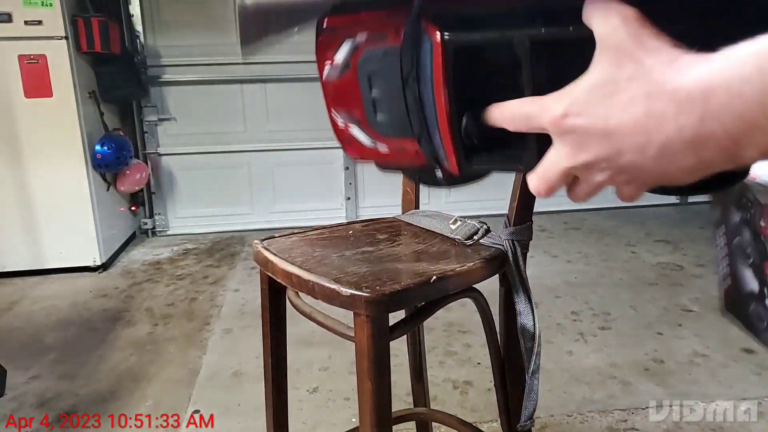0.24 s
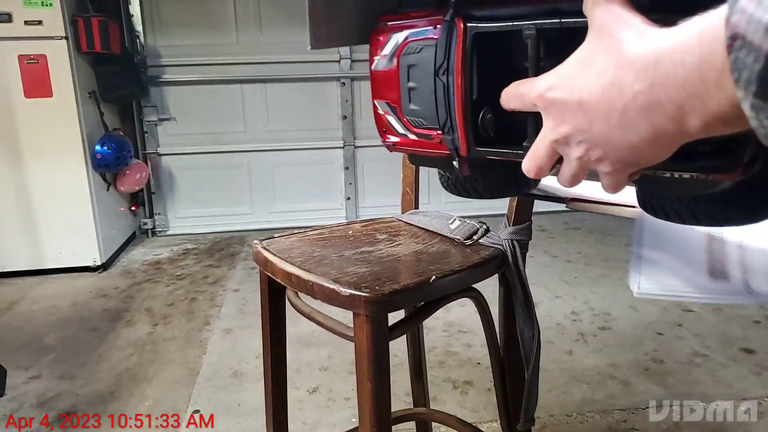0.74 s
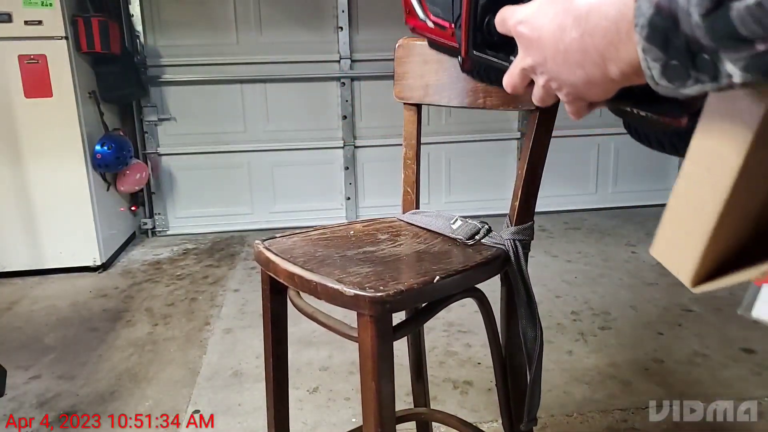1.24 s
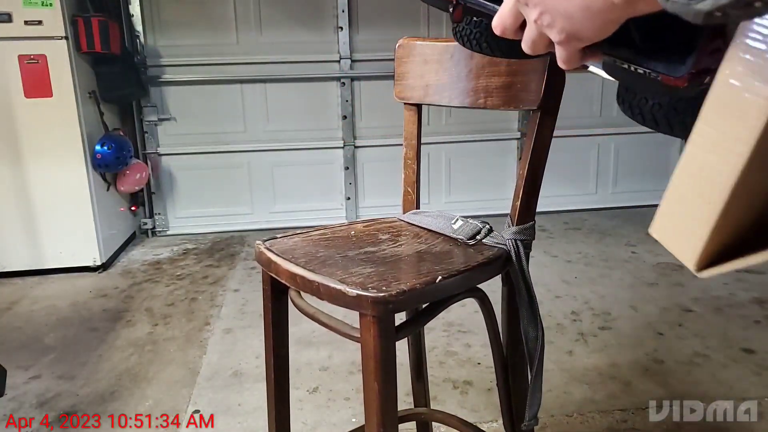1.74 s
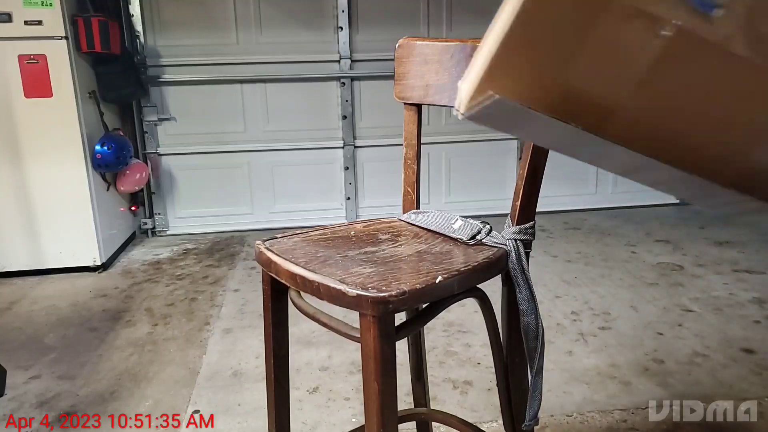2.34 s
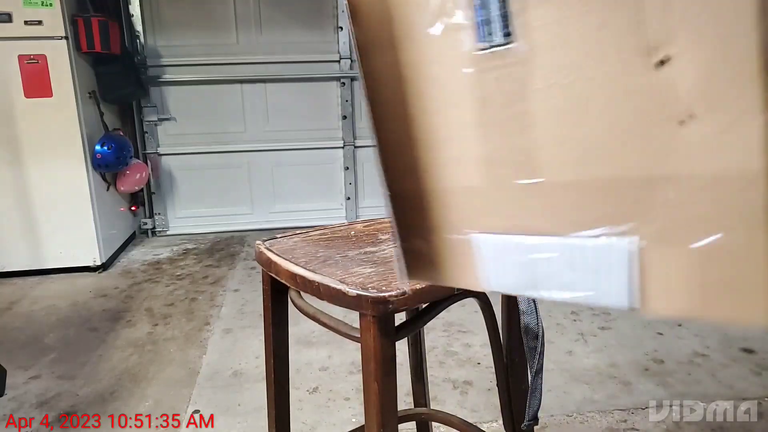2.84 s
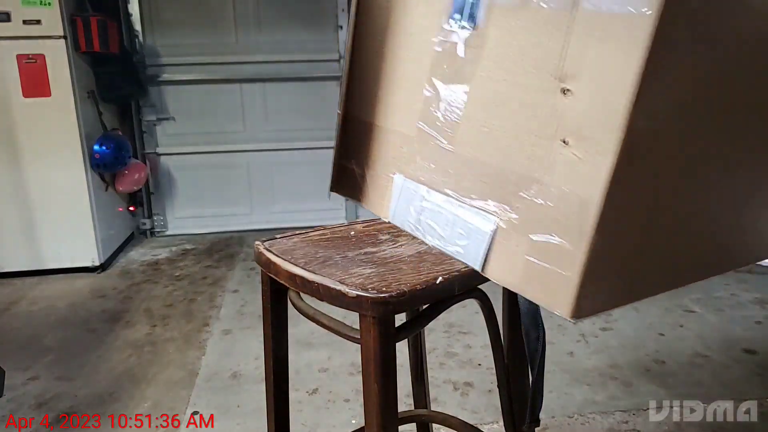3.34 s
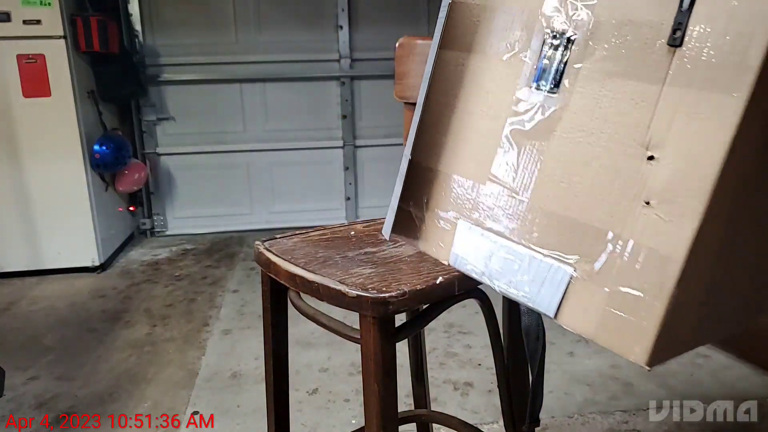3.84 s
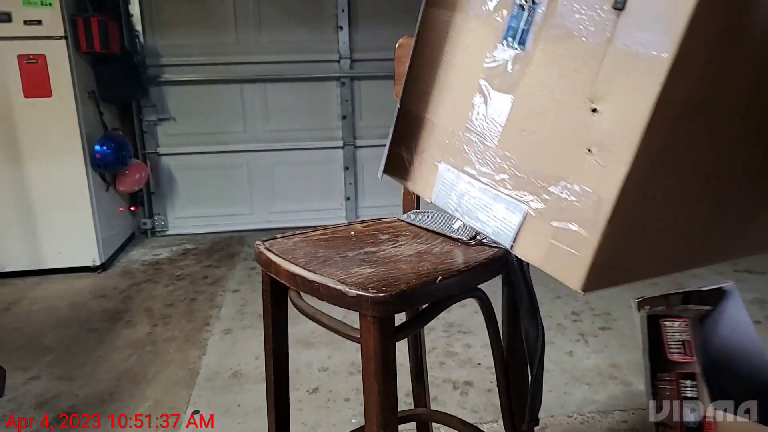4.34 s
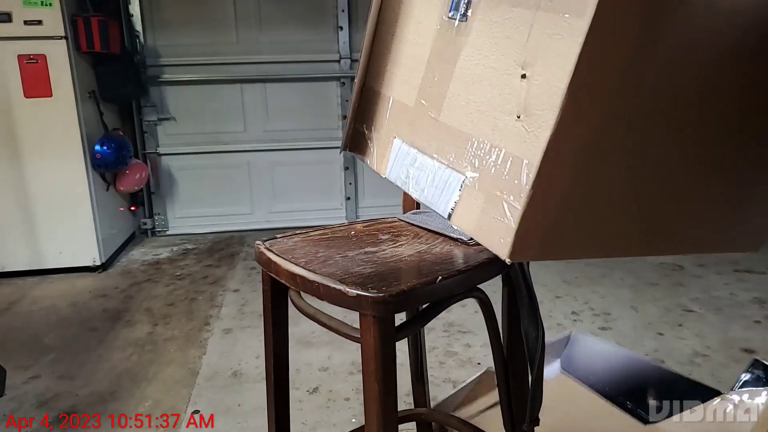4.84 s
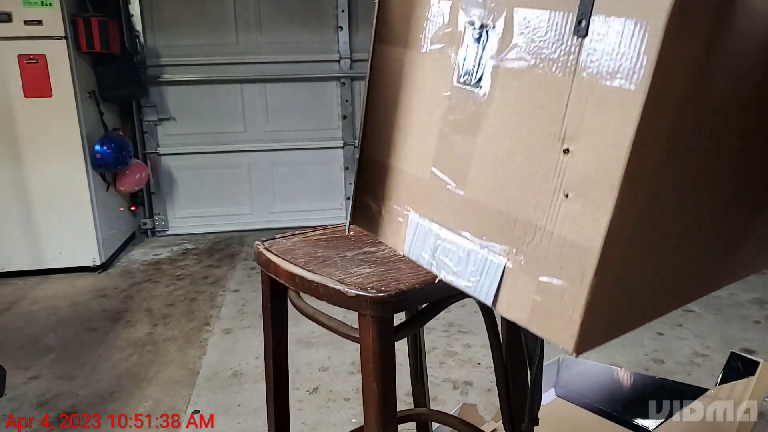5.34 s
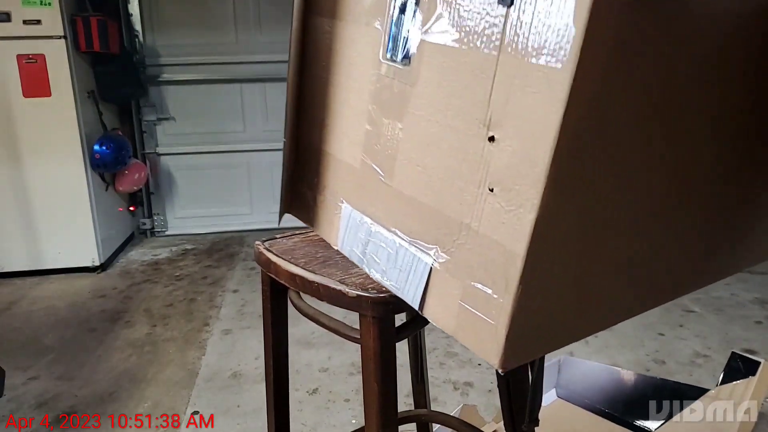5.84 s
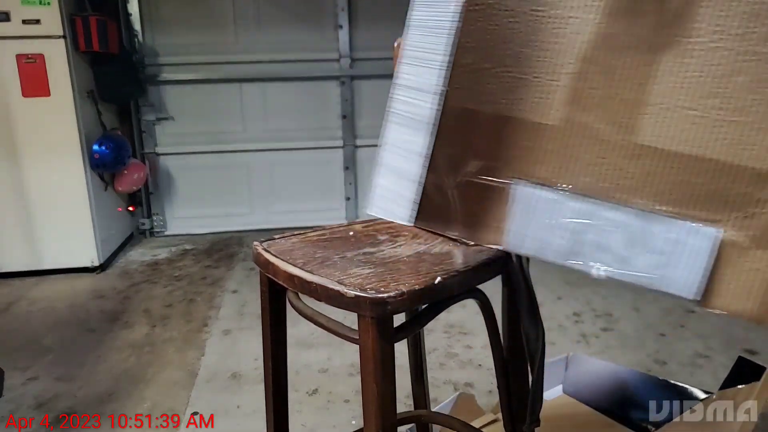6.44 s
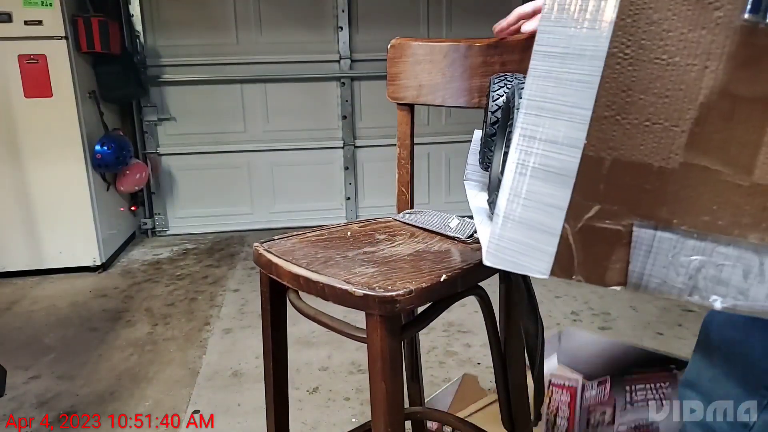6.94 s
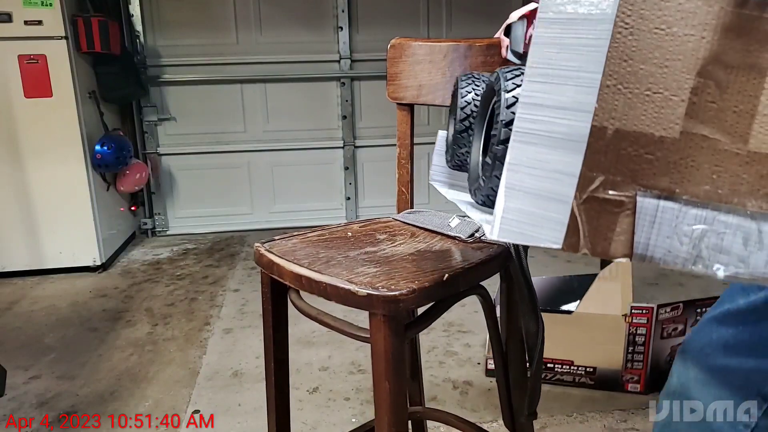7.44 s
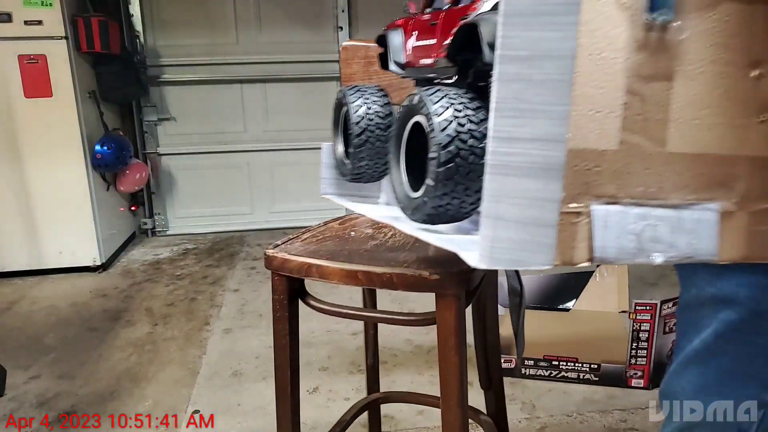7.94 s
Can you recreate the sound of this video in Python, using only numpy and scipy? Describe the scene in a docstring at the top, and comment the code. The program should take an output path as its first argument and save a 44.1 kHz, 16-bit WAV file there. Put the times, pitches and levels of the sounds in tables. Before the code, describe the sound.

Cardboard boxes knock, scrape and crackle close by in a bare garage, with sparse rustles between, ending in a juddering, squeaking pull from a carton.

```python
"""Cardboard packaging comes apart in a bare garage, close to two microphone ports.
From the start panels knock as ringing modes with a noisy crush, over rubbed-noise strokes and scuffs;
tape and creases tick in short noise snaps. Near three seconds filtered noise rattles like small metal.
At the end a toy truck's tray judders out of the carton: uneven slip pulses ring it, squeal and crackle.
Throughout, a low rumble swells with the flexing panels over still air; a dense tail answers the contacts."""
import sys
import numpy as np
from scipy import signal
from scipy.fft import rfft, irfft, next_fast_len
from scipy.io import wavfile

SR = 44100
rng = np.random.default_rng(int(sys.argv[2]) if len(sys.argv) > 2 else 0)


def waveform_to_disk(signal):
    """Save audio, clipped to [-1, 1], as 16-bit WAV at the path in sys.argv[1]."""
    frames = np.transpose(np.atleast_2d(signal))
    scaled = np.clip(frames, -1, 1) * 32767
    samples = np.round(scaled).astype(np.int16)
    wavfile.write(sys.argv[1], SR, samples)


N = 361170

# Levels marked "before trim" get a further gain in the function that plays them.
# Knocks: (time [s], clap [dB before trim], thump [dB before trim], panel pitch [Hz],
#          crack [dB before trim], time for the crush to fall 20 dB [s])
KNOCK_EVENTS = [(.004, -27, -24.5, 189, -34, 0.025), (.063, -21.5, -29.5, 396, -34, 0.016),
                (.205, -12, -16.5, 409, -14, .011), (.295, -18.5, -19, 140, -47, 0.015),
                (.338, -19, -27, 166, -47, 0.03), (.472, -25.5, -20.5, 246, -30, 0.016),
                (.551, -23.5, -34.5, 189, -22, 0.015), (.891, -37.5, -27.5, 216, -56, 0.062),
                (1.183, -11, -11, 260, -23.5, 0.013), (1.336, -26, -20, 237, -43, 0.023),
                (1.403, -24, -23.5, 234, -41, 0.057), (1.744, -36, -39, 251, -46, 0.03),
                (1.869, -43.5, -35.5, 248, -41.5, 0.078), (2.23, -62, -39, 235, -52, .014),
                (2.526, -35, -31.5, 243, -46, 0.0089), (2.554, -24, -32.5, 409, -38, 0.018),
                (2.59, -59, -31, 214, -52, .02), (2.805, -29.5, -30.5, 202, -52, .026),
                (2.821, -28, -25.5, 143, -45, 0.013), (2.913, -28, -29.5, 287, -31, 0.018),
                (2.991, -21.5, -22, 222, -11, 0.014), (3.085, -28.5, -30.5, 228, -45, 0.0073),
                (3.311, -36.5, -34.5, 241, -45, 0.0067), (3.999, -27.5, -31.5, 140, -33, 0.018),
                (4.013, -28, -28.5, 200, -39, 0.014), (4.119, -20.5, -27, 351, -37, 0.0065),
                (4.167, -26.5, -24.5, 149, -25.5, 0.018), (4.251, -17, -8, 303, -14, .015),
                (4.267, -15, -14.5, 304, -43, 0.036), (4.280, -13.5, -11, 207, -26, 0.034),
                (4.326, -20, -20.5, 340, -31.5, 0.05), (4.983, -11, -13.5, 177, -28, 0.015),
                (5.049, -34, -28, 223, -20, .016), (5.310, -40, -39, 202, -82, 0.0078),
                (5.559, -46, -52, 204, -66, 0.013), (5.941, -35, -32.5, 151, -47, .017),
                (6.559, -37.5, -29.5, 157, -58, 0.029), (6.891, -19, -23, 211, -35, .023),
                (6.909, -17, -16.5, 213, -43, 0.013), (6.922, -9.5, -15.5, 263, -37, 0.015),
                (6.935, -28, -8, 303, -42, .012), (6.951, -15.5, -4, 231, -34, 0.022),
                (6.997, -14, -16, 276, -16, 0.0067), (7.019, -18.5, -22, 220, -21, 0.041),
                (7.213, -32, -27.5, 201, -30, 0.01), (7.349, -33, -22, 229, -22, 0.013),
                (7.657, -23, -22, 260, -52, 0.015), (7.731, -14, -14, 253, -45, 0.047),
                (8.063, -34.5, -41, 182, -45, 0.048)]
# Modes of a struck panel: (multiple of its pitch [ratio], relative level [dB], t60 [s])
PANEL_MODES = [(0.702, -15.5, 0.046), (1, 3.5, 0.038), (1.5, -2.5, 0.022), (2.1, -15.5, 0.093),
               (2.9, -17.5, 0.046)]
# Colour of a clap: (multiple of its centre [ratio], relative density [dB per Hz])
CLAP_COLOUR = [(.15, -49), (.35, 3.5), (.7, -1.5), (1, -5), (1.5, -2), (2.4, -9), (4.5, -16.5), (12, -55),
               (30, -62)]
# Strokes of cardboard over cardboard: (start [s], swell [s], hold [s], panel drumming [dB before trim],
#                                       edge scrape [dB before trim], face hiss [dB before trim])
STROKE_EVENTS = [(0, 0.001, 0.026, -29.5, -29, -33), (0.172, 0.04, 0.096, -29, -31, -31.5),
                 (0.401, 0.046, 0.15, -41, -43, -42), (0.613, 0.024, .33, -56, -56.5, -49.5),
                 (1.004, 0.033, 0.25, -51, -57.5, -65.5), (1.16, .06, .12, -36, -44, -50),
                 (1.32, .085, .02, -29, -36, -41), (1.45, .04, .03, -45, -44, -50),
                 (1.55, .06, .17, -49, -58, -61), (1.82, 0.016, 0.25, -69, -65, -59.5),
                 (2.054, 0.12, 0.28, -52.5, -53.5, -50.5), (2.347, 0.047, 0.29, -53.5, -50, -51.5),
                 (2.663, 0.076, 0.047, -49.5, -52, -58), (2.785, 0.035, 0.12, -35.5, -43.5, -41.5),
                 (2.868, 0.074, .015, -51, -37, -36), (2.969, 0.04, 0.035, -42, -35.5, -31.5),
                 (3.28, 0.12, 0.46, -54, -66.5, -72), (3.6, 0.13, 0.72, -51, -57, -57.5),
                 (3.99, .025, .22, -35, -39, -43), (4.241, .005, .12, -32, -34, -39),
                 (4.39, .04, .05, -40, -44, -48), (4.5, .04, .18, -43, -50, -60),
                 (4.726, 0.046, 0.23, -40, -42, -49), (4.987, 0.037, 0.063, -27, -32.5, -42.5),
                 (5.412, .012, 0.049, -55, -55, -60.5), (5.56, 0.027, 0.064, -54, -59.5, -63.5),
                 (5.819, 0.082, 0.14, -53.5, -56.5, -63.5), (5.949, 0.083, 0.013, -37, -35.5, -41),
                 (6.076, 0.026, 0.075, -46, -47, -49), (6.534, 0.021, 0.23, -48, -61.5, -83),
                 (6.787, 0.058, 0.082, -42, -43, -42.5), (6.873, 0.049, 0.14, -23, -23.5, -36),
                 (7.11, .04, 0.063, -54, -58, -46.5), (7.202, 0.031, 0.17, -38, -38.5, -41),
                 (7.298, .015, 0.29, -37.5, -37, -39), (7.653, 0.031, 0.1, -25, -26.5, -48),
                 (7.826, 0.021, 0.069, -27, -33.5, -49), (8.046, .03, 0.076, -35, -53, -62)]
# Colour of a rubbed panel drumming: (frequency [Hz], relative density [dB per Hz])
DRUM_COLOUR = [(30, -46.5), (80, -39), (130, -10.5), (180, 5), (260, -1), (440, -2.5), (600, -9.5),
               (1200, -39), (5000, -80.5)]
# Colour of a scraping edge: (frequency [Hz], relative density [dB per Hz])
SCRAPE_COLOUR = [(250, -35.5), (500, -0.5), (800, 3), (1400, 0), (2300, -4), (3600, -7.5), (5500, -19.5),
                 (9000, -44), (14000, -82.5)]
# Colour of flat faces sliding, also of a crack: (frequency [Hz], relative density [dB per Hz])
HISS_COLOUR = [(500, -59), (2000, -0.5), (4000, 1), (5500, -1), (7200, -5), (9200, -1), (12000, -2.5),
               (15500, -2)]
# Force on the tray as it sticks and slips out of the carton: (time [s], level [dB before trim])
JUDDER_FORCE = [(7.64, -40), (7.66, -19.5), (7.735, -14.5), (7.785, -18.5), (7.83, -26.5), (7.89, -23),
                (8.0, -33), (8.07, -35), (8.19, -44)]
# Ringing of the carton with the tray in it: (frequency [Hz], width [Hz], relative level [dB])
TRAY_MODES = [(176, 9.5, -3.5), (254.9, 9.8, 9), (361, 19, 2), (505, 35, -8.5), (723, 54, -8),
              (1116, 14, -18), (1360, 9.8, -19)]
# Squeal of the tray while pressed hard: (frequency [Hz], width [Hz], relative level [dB])
SQUEAL_MODES = [(1778, 45, 0), (2388, 35, -2), (3090, 80, -3), (3800, 90, -12)]
# Colour of creases crackling under the tray: (frequency [Hz], relative density [dB per Hz])
CRACKLE_COLOUR = [(1000, -25), (3500, -5), (8000, 4), (14000, -15)]
# Scuffs, an edge chattering at one pitch: (time [s], level [dB], pitch [Hz], width [Hz], length [s])
SCUFF_EVENTS = [(0.063, -34.5, 1010, 296, .014), (0.2, -18, 1500, 910, 0.02),
                (1.183, -36, 2530, 2190, .013), (2.164, -53, 1300, 800, 0.041),
                (2.299, -49, 1500, 900, 0.022), (2.381, -47, 1010, 500, 0.05),
                (2.985, -33, 3900, 350, 0.02), (4.26, -18.5, 458, 190, 0.055), (4.57, -50, 1170, 600, .17),
                (5.308, -50, 694, 597, 0.026), (6.807, -51, 3000, 2000, .07),
                (6.918, -17, 2450, 900, 0.0071), (6.996, -16, 1420, 350, 0.0061),
                (7.317, -33.5, 725, 200, 0.028), (7.38, -39, 536, 140.7, 0.15),
                (7.51, -36.5, 3170, 1600, 0.062), (7.55, -34, 290, 109, .073), (7.86, -28, 200, 70.5, 0.1)]
# Ticks of tape or of a crease: (time [s], level [dB before trim], centre [Hz])
TICK_EVENTS = [(.161, -28.5, 13000), (.390, -26, 8000), (.570, -24, 9100), (.643, -30, 5930),
               (.691, -29, 9100), (2.552, -20.5, 13200), (2.630, -32, 12000), (2.756, -39, 10100),
               (3.521, -37, 10100), (3.561, -38, 3300), (3.795, -29, 12800), (4.251, -18, 10000),
               (4.766, -38, 10000), (4.814, -32.5, 9200), (4.982, -17.5, 2576), (6.022, -25.5, 8950),
               (6.134, -31.5, 10400), (6.897, -17.5, 6500), (6.946, -10.5, 6340), (7.724, -18, 5560),
               (7.758, -23.5, 4950)]
# Resonances of a small metal part: (frequency [Hz], width [Hz], relative level [dB])
BUCKLE_MODES = [(3920, 91, -1), (9400, 300, -4), (10900, 560, -4), (12600, 230, -6)]
# Heaves, a big panel flexing slowly: (start [s], peak level of the rumble [dB])
HEAVE_EVENTS = [(.26, -28), (0.462, -33.5), (1.16, -38), (1.38, -38.5), (2.79, -32.5), (2.97, -36),
                (3.98, -34), (4.1, -36.5), (4.25, -25.5), (4.7, -34), (4.96, -31.5), (6.57, -44),
                (6.89, -25.5), (7.09, -36.5), (7.3, -36.5), (7.54, -39), (7.71, -43)]
# Colour of the low rumble: (frequency [Hz], relative density [dB per Hz])
RUMBLE_COLOUR = [(15, -33.5), (30, -10), (48, -2), (80, -1), (105, -8.5), (150, -10), (400, -51)]
# Colour of the room's still air: (frequency [Hz], relative density [dB per Hz])
AIR_COLOUR = [(60, -14.5), (110, -1), (200, -6.5), (360, -7.5), (600, -18), (1300, -26), (2500, -34),
              (7000, -68), (12000, -34), (16000, -41.5)]
# Decay of the garage: (frequency [Hz], t60 [s])
GARAGE_DECAY = [(100, 0.2), (300, 0.4), (1000, 0.39), (4000, 0.4), (9000, 0.34), (16000, 0.24)]
# Likeness of diffuse sound at the two ports: (frequency [Hz], correlation [-1 to 1])
PORT_LIKENESS = [(100, 0.98), (250, 0.96), (500, 0.84), (1000, 0.39), (2000, -0.0052), (5000, -0.19),
                 (16000, -0.12)]

# The more a blow claps over its thump, the brighter the clap; CLAP_HZ is its centre when both are equal
CLAP_HZ, HARDNESS_DB_PER_OCTAVE = 786, 15
# A stroke loses a little force while it lasts, then runs out
STROKE_SAG_DB, STROKE_RELEASE_DB_PER_S = 4.5, 223.5
BUCKLE_S, BUCKLE_DB, BUCKLE_T60_S = 2.991, -33.5, 0.27
HEAVE_PEAK_S = 0.044  # a heave peaks this long after its start and dies away more slowly
RUMBLE_DB, AIR_DB = -47, -57  # steady levels of the room
EDGE_HZ = 15800  # upper band limit


def amp(db):
    """Decibels to gain."""
    return 10 ** (np.asarray(db) / 20)


def unit(x):
    """Scales to rms 1."""
    return x / np.sqrt(np.mean(x ** 2) + 1e-20)


def read(points, hz):
    """Reads a curve on a log-frequency axis."""
    f, value = np.transpose(points)
    return np.interp(np.log(hz + 1), np.log(f + 1), value)


def add(mix, s, sound):
    """Mixes a sound in at time s, cut off at the end of the mix."""
    part = mix[:, round(s * SR):][:, :sound.shape[-1]]
    part += sound[..., :part.shape[1]]


def colour(x, points, size=4096):
    """Filters with the given spectrum in minimum phase, so nothing sounds ahead of its cause."""
    log_gain = np.log(amp(read(points, abs(np.fft.fftfreq(size, 1 / SR)))))
    spectrum = np.exp(np.conj(signal.hilbert(log_gain)))
    taps = np.fft.ifft(spectrum).real[:size // 2]
    return signal.oaconvolve(x, taps[None], axes=1)[:, :x.shape[1]]


def ring(x, modes):
    """Passes x through fixed resonances, each a decaying cosine, and scales to rms 1."""
    t = np.arange(SR // 4) / SR
    response = sum(amp(db) * width * np.exp(-np.pi * width * t) * np.cos(2 * np.pi * hz * t)
                   for hz, width, db in modes)
    return unit(signal.oaconvolve(x, response[None], axes=1)[:, :N])


def ports(pair):
    """Two unrelated signals become alike in the bass, as at two close microphones."""
    size = next_fast_len(pair.shape[1])
    a, b = rfft(pair, size)
    same = np.clip(read(PORT_LIKENESS, np.fft.rfftfreq(size, 1 / SR)), -1, 1)
    mid = a * np.sqrt((1 + same) / 2)
    side = b * np.sqrt((1 - same) / 2)
    return irfft([mid + side, mid - side], size)[:, :pair.shape[1]]


def noise(size):
    """Diffuse white noise at both ports."""
    return ports(rng.standard_normal((2, size)))


def wander(per_s):
    """Random curve of rms 1, joining per_s fresh points a second by straight lines."""
    return unit(np.interp(np.arange(N) / SR * per_s, np.arange(N), rng.standard_normal(N)))


def catches(per_s, spread_db, smooth):
    """Fibres catch and release: clicks of uneven size over a fine rub."""
    size = amp(spread_db * np.minimum(rng.exponential(1, N), 2))
    size *= rng.random(N) < per_s / SR
    clicks = ports(size * np.sign(rng.standard_normal((2, N))))
    return unit(unit(clicks) + smooth * noise(N))


def garage(x, wet_db, build_s=0.0036):
    """Direct sound plus a dense tail that builds up fast and decays at its own rate in each band."""
    hz, t, z = signal.stft(noise(SR), SR, nperseg=256)
    decay = amp(-60 * t / read(GARAGE_DECAY, hz)[:, None])
    tail = signal.istft(z * decay, SR, nperseg=256)[1]
    tail *= 1 - np.exp(-(np.arange(tail.shape[1]) / SR / build_s) ** 2)
    tail /= np.linalg.norm(tail[0])
    return x + amp(wet_db) * signal.fftconvolve(x, tail, axes=1)[:, :N]


def knocks(thump_db=1, clap_db=-5, flap_db=-5, crack_db=-4, give_s=0.00059, bite_s=0.00064,
           flap_t60_s=0.012, baffle_hz=110, places=2):
    """A blow rings the panel and a stiff flap, while the flutes crush with a clap and a crack."""
    t = np.arange(SR // 8) / SR
    # knocks take turns between places, each with its own echoes
    thumps, claps = np.zeros((2, places, 2, N))
    for k, (s, clap, thump, hz, crack, crush) in enumerate(KNOCK_EVENTS):
        centre = CLAP_HZ * 2 ** ((clap - thump) / HARDNESS_DB_PER_OCTAVE)
        clap_colour = [(centre * ratio, db) for ratio, db in CLAP_COLOUR]
        panel = sum(amp(db - 60 * t / t60) * np.sin(2 * np.pi * hz * ratio * t)
                    for ratio, db, t60 in PANEL_MODES)
        panel *= 1 - np.exp(-t / give_s)  # soft board takes up the blow gradually
        flap = amp(clap + flap_db - 60 * t / flap_t60_s) * np.sin(2 * np.pi * centre * t)
        burst = amp(-20 * t / crush) * (1 - np.exp(-t / bite_s))
        slap = amp(clap + clap_db) * unit(colour(noise(len(t)), clap_colour))
        snap = amp(crack + crack_db) * unit(colour(noise(len(t)), HISS_COLOUR))
        add(thumps[k % places], s, amp(thump + thump_db) * panel)
        add(claps[k % places], s, flap + burst * (slap + snap))
    # open boxes radiate little bass
    thumps = signal.sosfilt(signal.butter(2, baffle_hz, "high", fs=SR, output="sos"), thumps)
    return sum(garage(low, wet_db=-1.5) + garage(high, wet_db=-5.0) for low, high in zip(thumps, claps))


def strokes():
    """Gain curves of drumming, scrape and hiss: every stroke swells, sags and runs out."""
    power = np.zeros((3, N))
    for start, swell, hold, *layers_db in STROKE_EVENTS:
        t = np.arange(int((swell + hold + .5) * SR)) / SR
        sag_db = STROKE_SAG_DB * np.clip((t - swell) / hold, 0, 1)
        release_db = STROKE_RELEASE_DB_PER_S * np.maximum(t - swell - hold, 0)
        shape = np.minimum(t / swell, 1) * amp(-sag_db - release_db)
        add(power, start, (amp(layers_db)[:, None] * shape) ** 2)
    return np.sqrt(power)


def sliding(drum_db=-1, scrape_db=-1, hiss_db=3, grip_db=2.0):
    """An uneven grip drives panel drumming, edge scrape and the hiss of flat faces."""
    drum, scrape, hiss = strokes()
    grip = unit(amp(grip_db * wander(per_s=72)))
    coarse = grip * catches(per_s=900, spread_db=2.5, smooth=0.83)
    fine = grip * catches(per_s=3100, spread_db=5.0, smooth=1.1)
    rub = amp(drum_db) * drum * unit(colour(coarse, DRUM_COLOUR))
    rub += amp(scrape_db) * scrape * unit(colour(coarse, SCRAPE_COLOUR))
    rub += amp(hiss_db) * hiss * unit(colour(fine, HISS_COLOUR))
    return garage(rub, wet_db=-8)


def judder(level_db=-4, squeal_db=-16, crackle_db=-20, slip_hz=124, uneven=.09, rub=0.44, steep=2.1,
           soft_hz=6000):
    """The tray slips in quick, uneven jerks that ring the carton; hard slips also squeal and crackle."""
    turns = np.cumsum(slip_hz * np.exp(uneven * wander(per_s=150))) / SR
    slips = np.diff(np.floor(turns), prepend=0)  # one pulse a turn
    slips *= amp(2 * np.tanh(wander(per_s=170)))
    drive = unit(slips - slips.mean()) + rub * noise(N)
    # soft contact dulls the jerks
    drive = signal.sosfilt(signal.butter(2, soft_hz, fs=SR, output="sos"), drive)
    t = np.arange(N) / SR
    times, force_db = np.transpose(JUDDER_FORCE)
    force = amp(np.interp(t, times, force_db)) * (t > times[0])
    pressed = force.max() * (force / force.max()) ** steep  # favours the hard slips
    body = amp(level_db) * force * ring(drive, TRAY_MODES)
    squeal = amp(squeal_db) * pressed * ring(drive, SQUEAL_MODES)
    creases = catches(per_s=140, spread_db=8, smooth=0.2)
    crackle = amp(crackle_db) * pressed * unit(colour(creases, CRACKLE_COLOUR))
    return garage(body + squeal + crackle, wet_db=-1.5)


def scuffs():
    """An edge drags briefly and chatters in one resonance."""
    hz = np.fft.rfftfreq(SR, 1 / SR)
    out = np.zeros((2, N))
    for s, db, pitch, width, length in SCUFF_EVENTS:
        size = int(length * SR)
        resonance = 1 / (1 + (2 * (hz - pitch) / width) ** 2)
        chatter = irfft(rfft(noise(SR)) * resonance, SR)[:, :size]
        add(out, s, amp(db) * unit(chatter) * np.hanning(size) ** .5)
    return garage(out, wet_db=-5)


def ticks(level_db=2, fade_s=0.00068, width=0.61):
    """Tape and creases let go in noise snaps about a millisecond long, each around its own centre."""
    t = np.arange(SR // 50) / SR
    hz = np.fft.rfftfreq(len(t), 1 / SR) + 1
    out = np.zeros((2, N))
    for s, db, centre in TICK_EVENTS:
        band = np.exp(-(np.log(hz / centre) / width) ** 2)  # width in natural-log frequency
        fizz = irfft(rfft(noise(len(t))) * band, len(t))
        add(out, s, amp(db + level_db) * unit(fizz) * np.exp(-t / fade_s))
    return garage(out, wet_db=-5.5)


def buckle():
    """A small metal part, bumped once by the carton, leaves a thin rattle that dies away."""
    age = np.arange(N) / SR - BUCKLE_S
    fade = (age > 0) * amp(BUCKLE_DB - 60 * abs(age) / BUCKLE_T60_S)
    return garage(fade * ring(noise(N), BUCKLE_MODES), wet_db=-0.5)


def flexing():
    """Gain curve of the panels' slow heaves."""
    age = np.arange(SR // 2) / SR / HEAVE_PEAK_S
    power = np.zeros((1, N))
    for s, db in HEAVE_EVENTS:
        add(power, s, (amp(db) * age * np.exp(1 - age)) ** 2)
    return np.sqrt(power)


def background():
    """Low rumble that swells as the panels flex, and the still air of the room."""
    rumble = np.hypot(amp(RUMBLE_DB), flexing()) * unit(colour(noise(N), RUMBLE_COLOUR))
    air = amp(AIR_DB) * unit(colour(noise(N), AIR_COLOUR))
    return rumble + air


def scene():
    """All sources at the two ports."""
    return knocks() + sliding() + judder() + scuffs() + ticks() + buckle() + background()


def record(dry, low_cut_hz=32):
    """The microphone's bass roll-off, the full-scale limit, then the band limit."""
    heard = signal.sosfilt(signal.butter(2, low_cut_hz, "high", fs=SR, output="sos"), dry)
    edge = signal.firwin(401, EDGE_HZ, window=("kaiser", 8), fs=SR)
    return signal.oaconvolve(np.clip(heard, -1, 1), edge[None], "same")


dry = scene()
out = record(dry)
waveform_to_disk(out)
```